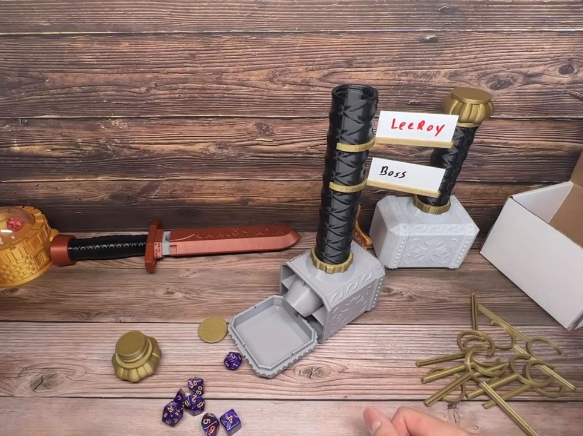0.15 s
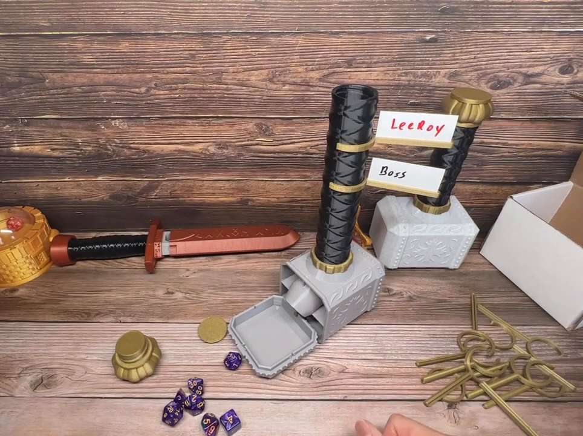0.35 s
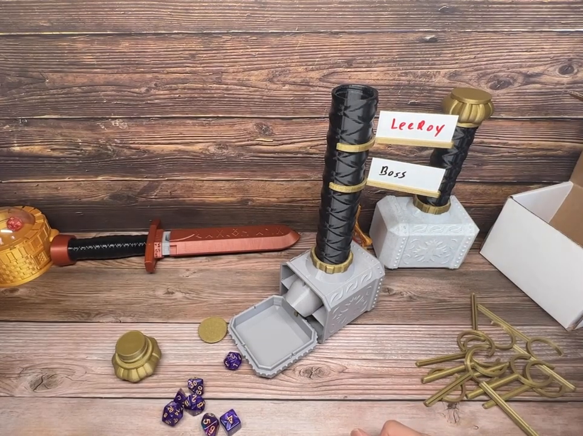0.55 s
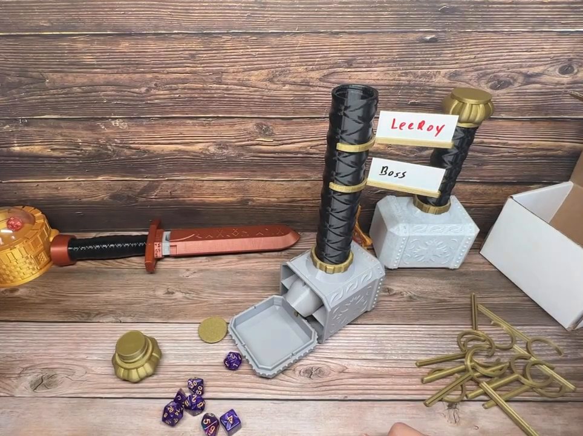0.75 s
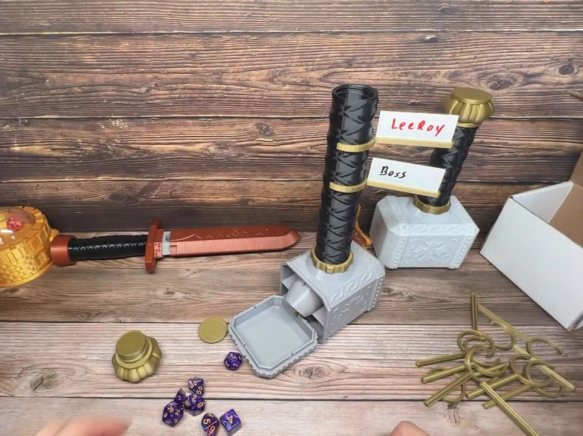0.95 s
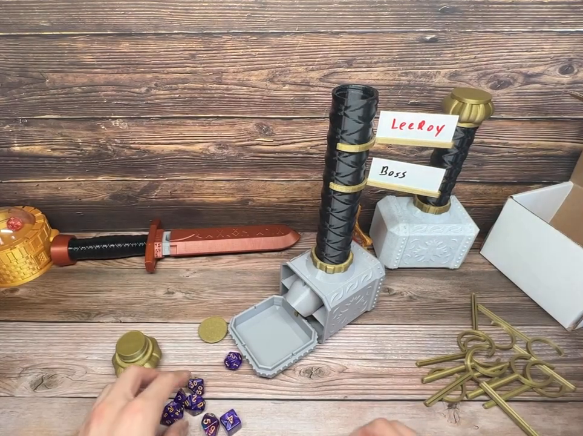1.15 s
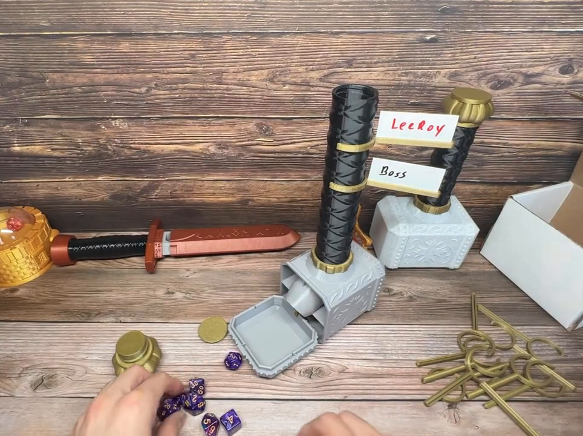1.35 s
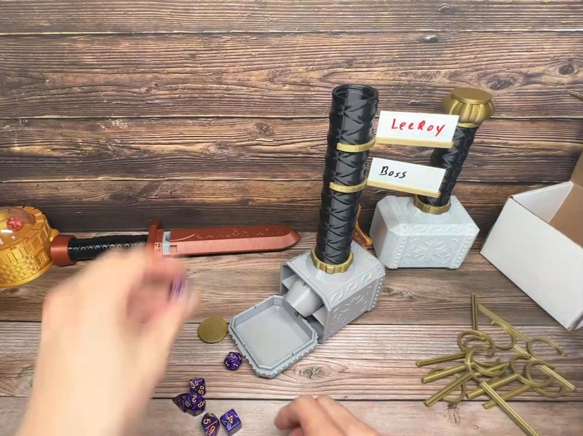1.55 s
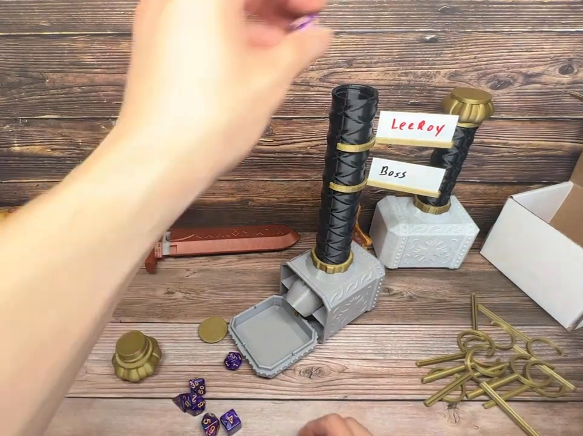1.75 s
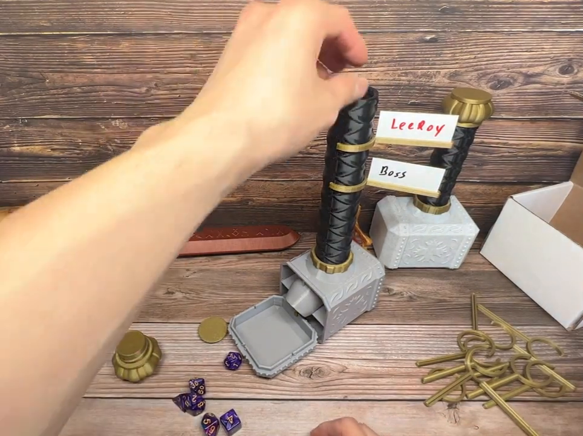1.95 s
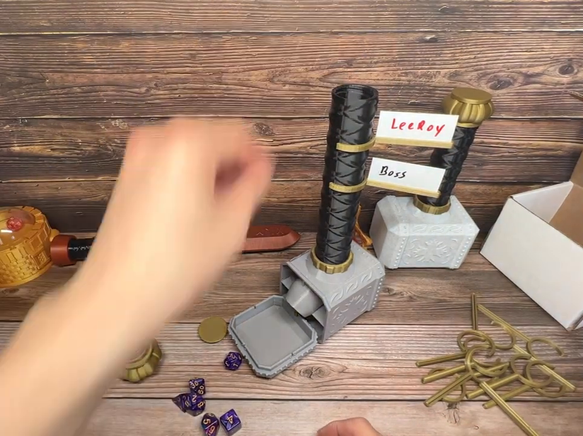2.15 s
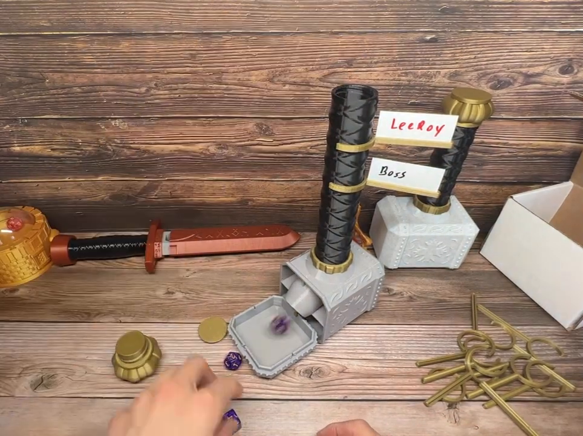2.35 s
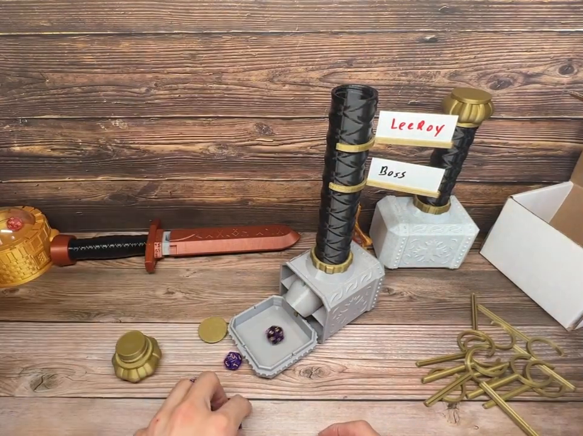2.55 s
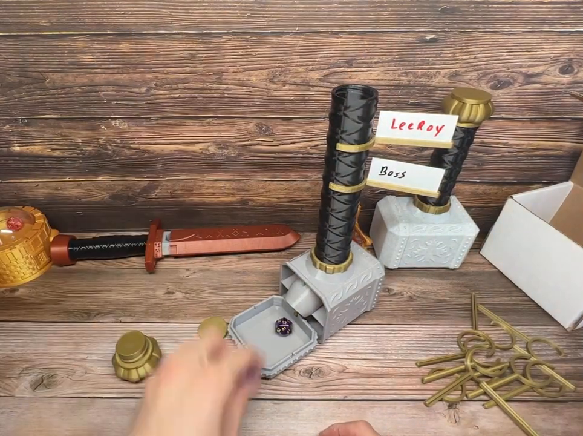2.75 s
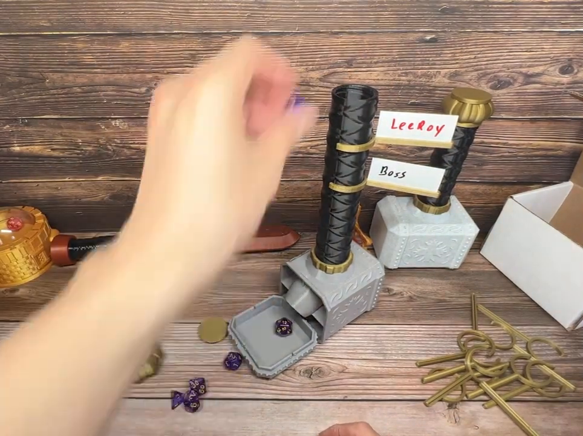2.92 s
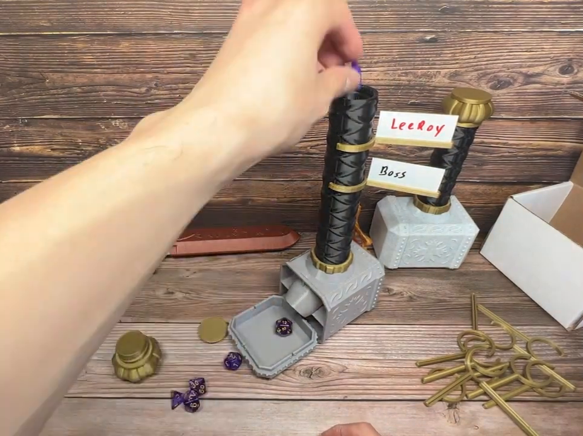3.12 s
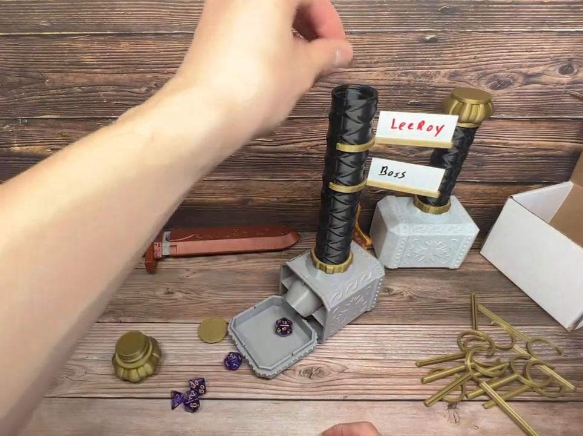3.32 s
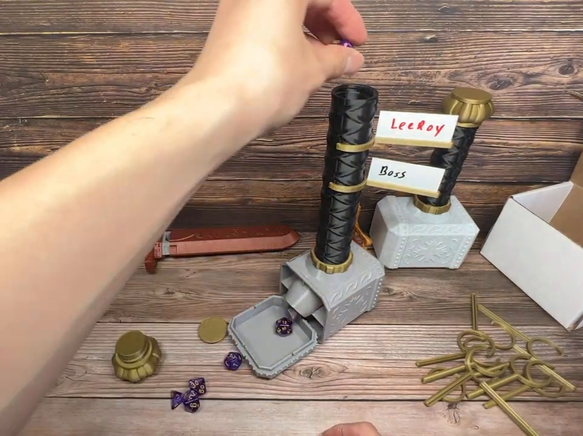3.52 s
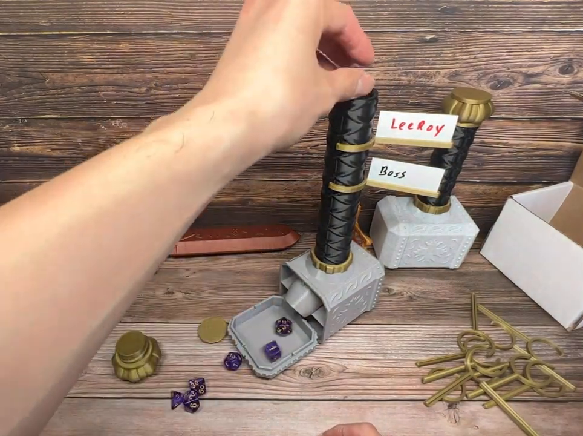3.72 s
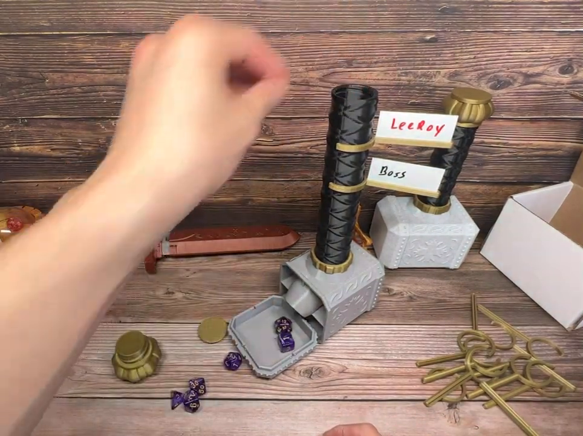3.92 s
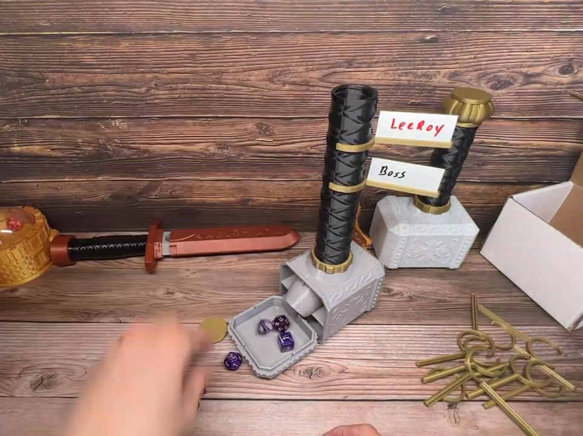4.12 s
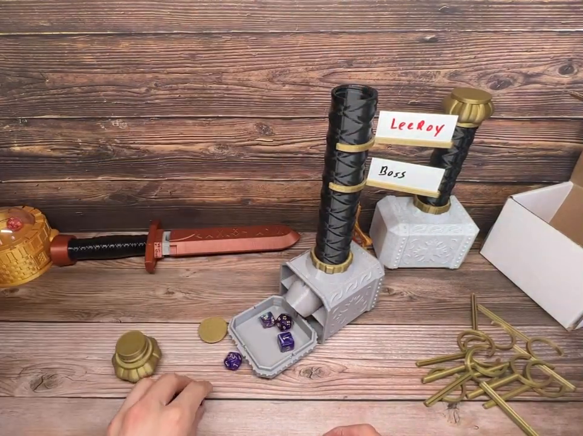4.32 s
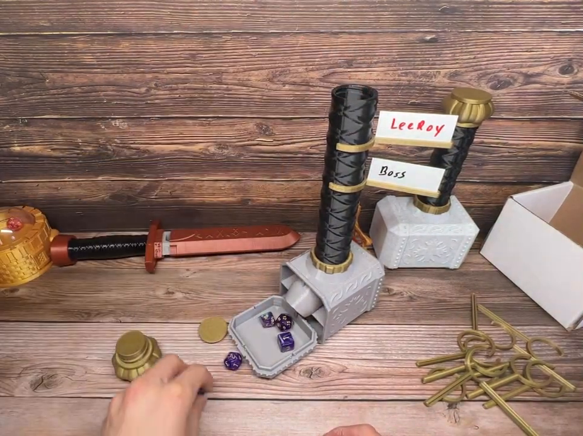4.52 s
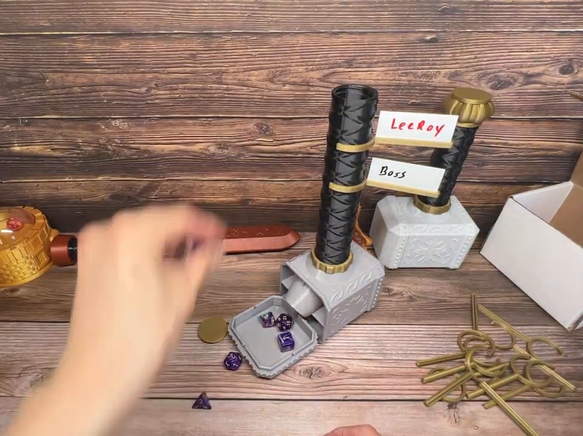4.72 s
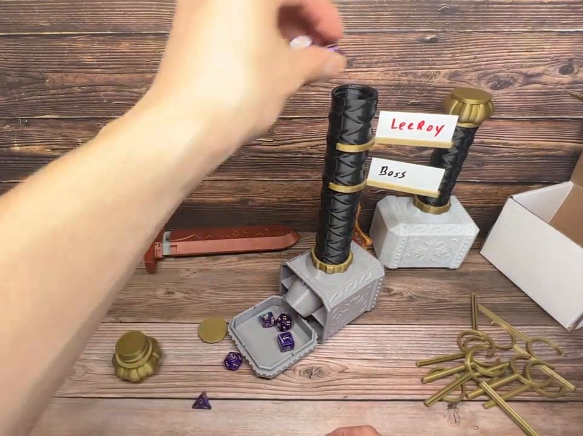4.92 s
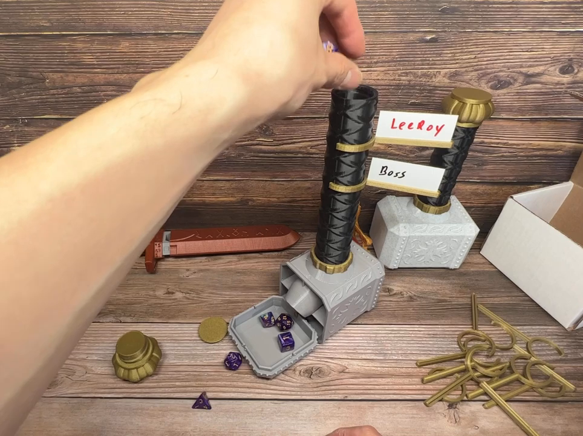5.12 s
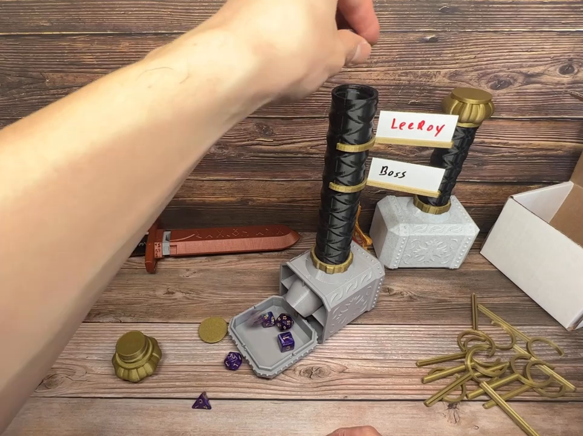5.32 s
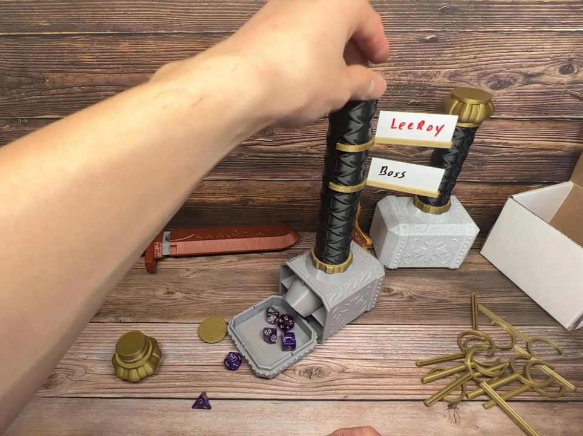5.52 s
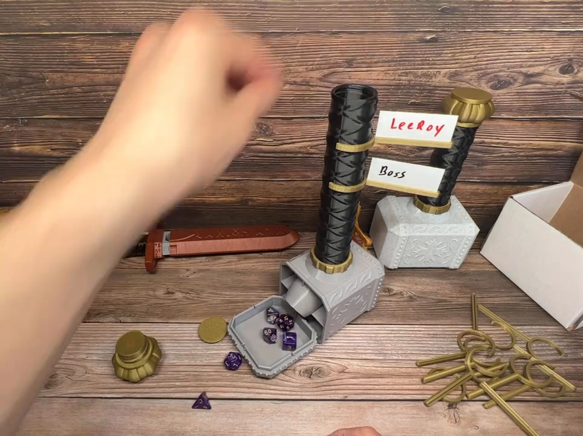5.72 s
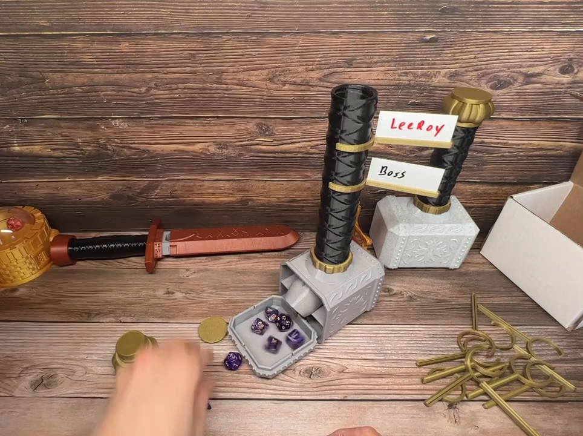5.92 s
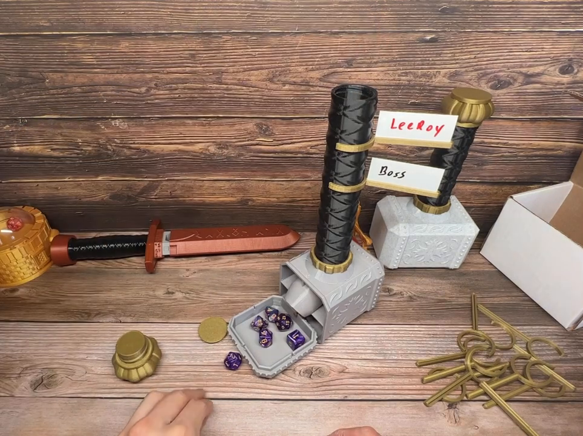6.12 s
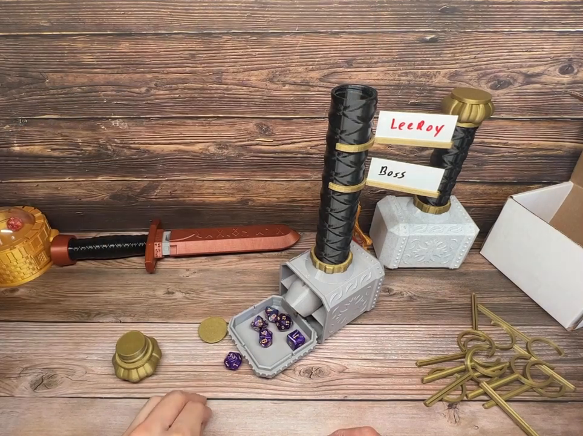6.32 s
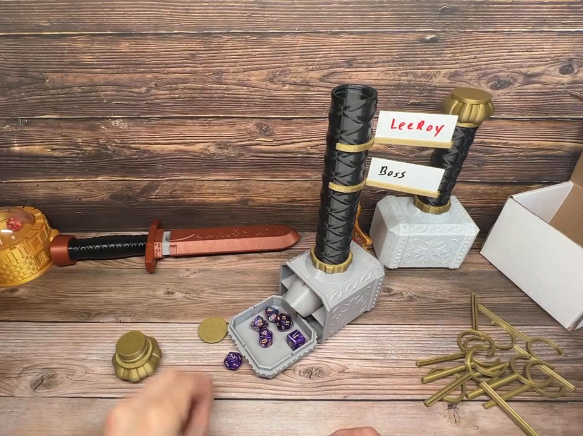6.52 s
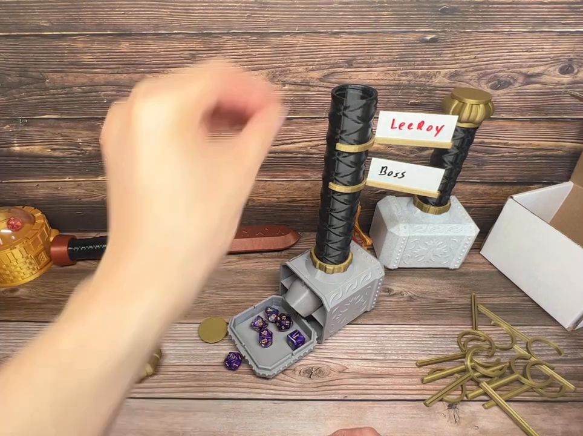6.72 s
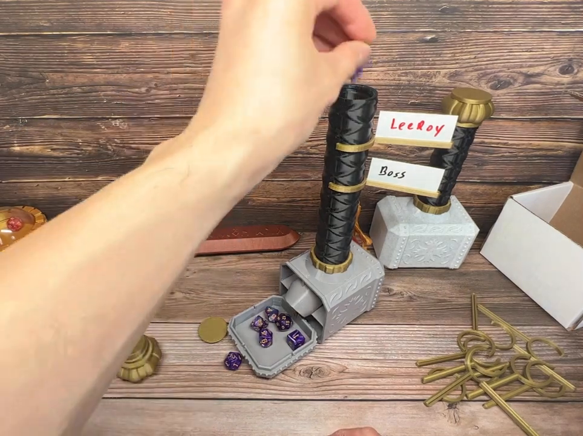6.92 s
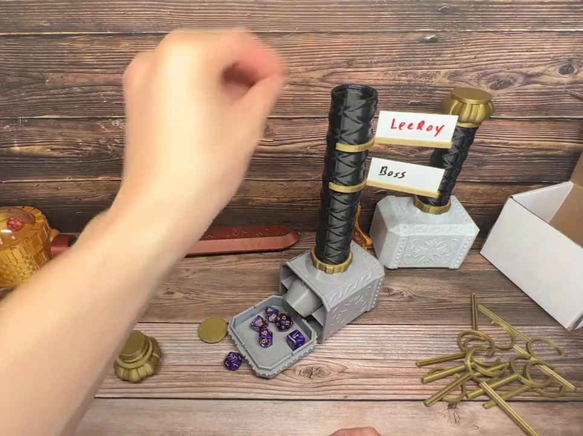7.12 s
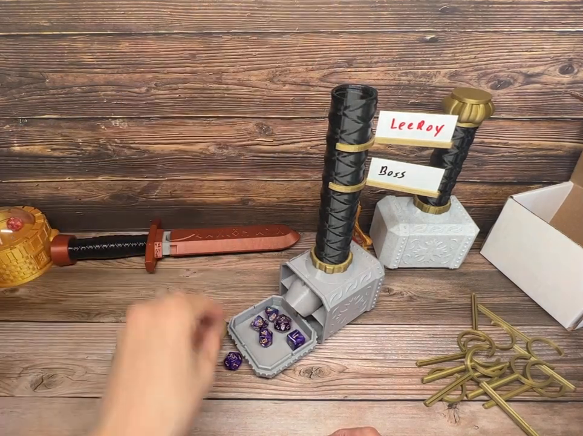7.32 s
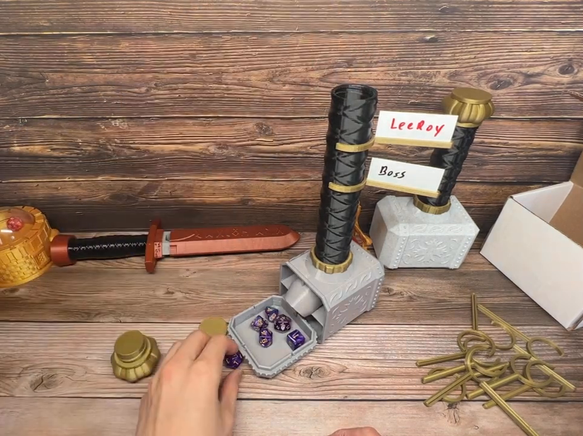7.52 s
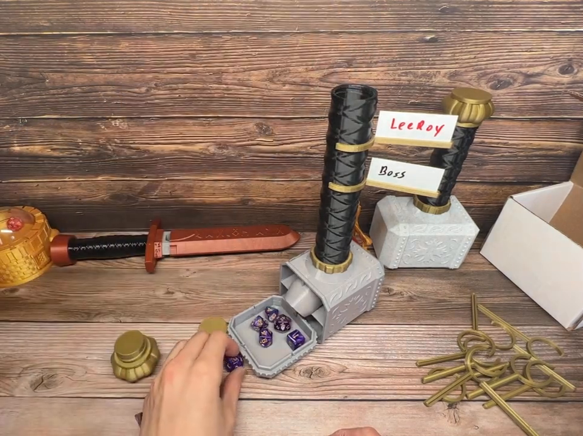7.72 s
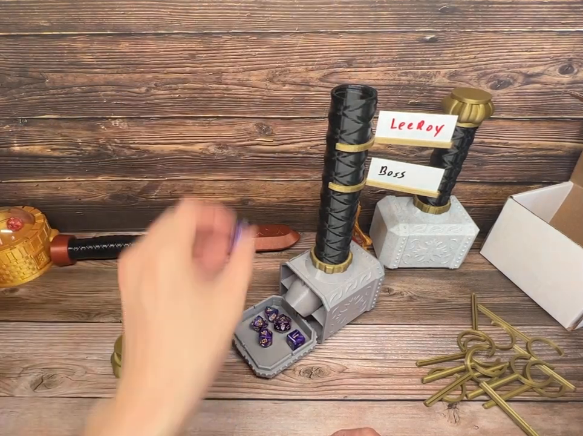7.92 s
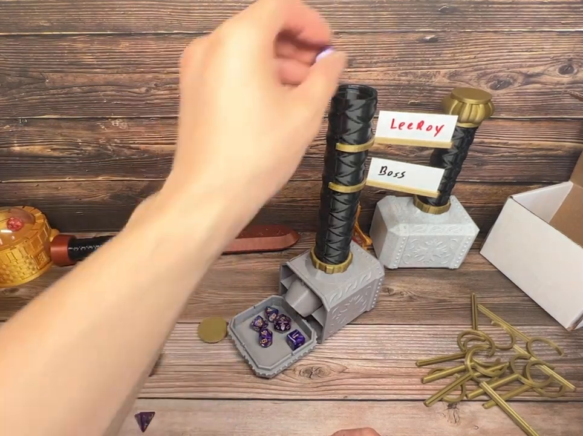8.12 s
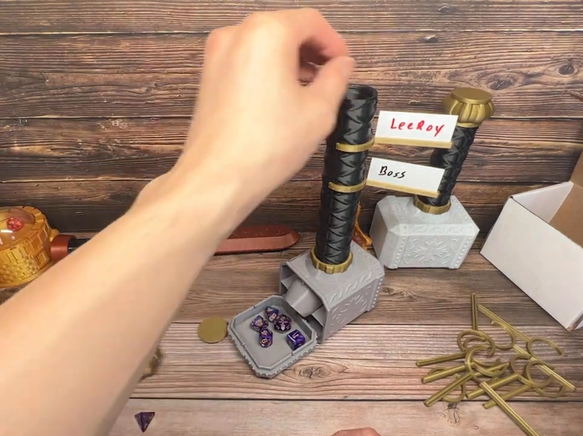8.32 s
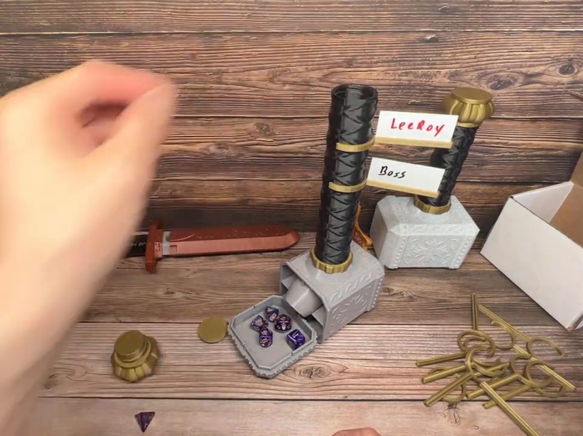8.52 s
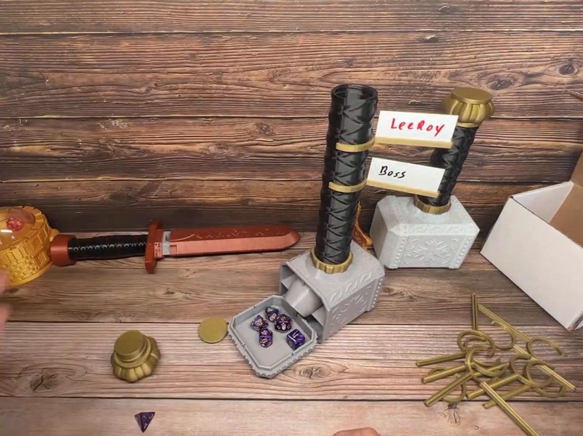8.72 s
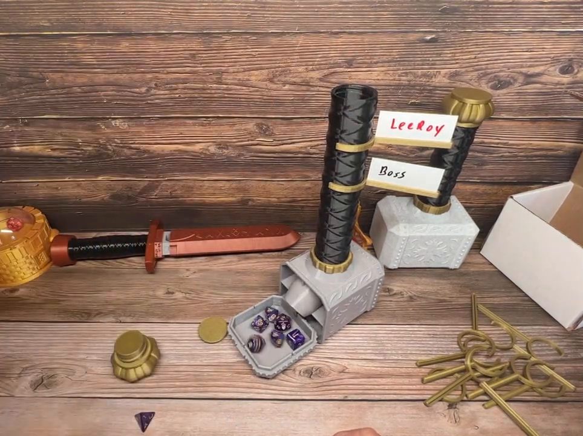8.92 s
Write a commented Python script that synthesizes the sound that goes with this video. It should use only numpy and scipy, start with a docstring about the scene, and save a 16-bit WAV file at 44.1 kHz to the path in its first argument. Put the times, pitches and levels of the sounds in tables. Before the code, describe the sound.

A quiet small room with a faint wavering low hum, heard closely in stereo. A soft sleeve swish opens, with little cloth movements around 1 s and tiny dice clicks at 1.35-1.45. At 2.0 a die ticks down a plastic tube, bangs on the hollow ramp at 2.2, then bounces and rolls in the tray until 2.7. More ticks start at 3.2, with a loud bang at 3.45 and tray bounces; another bang at 3.97 brings a rattling roll and small clicks to 4.65. Sleeve rustle near 5, ticks at 5.13, bang at 5.32, short clatter; another bang at 5.78 and bounces to 6.1. Faint ticks at 7.05 lead to a bang at 7.2 and bright dice-on-dice clacks until 7.7. Light ticks from 8.3, bangs at 8.46 and 8.75, and a final crisp tray rattle at 8.9.

```python
"""Dice in a plastic tower

Plastic dice drop one by one through a tower on a wooden table: ticks in the tube, bangs on the hollow
ramp, bounces and rolls in the tray, clicks of die on die. A contact is an impulse plus a noise burst,
coloured by the struck part and its ringing modes. Falls thump the table top as decaying sines, and a
small room answers with decaying noise. Filtered noise makes the sleeve swishes and the low hum.
"""
import sys
import numpy as np
from scipy import signal
from scipy.fft import rfft, irfft, next_fast_len
from scipy.io import wavfile

SR = 44100
rng = np.random.default_rng(int(sys.argv[2]) if len(sys.argv) > 2 else 0)


def unload_audio(sound):
    """Save the sound as a 16-bit wav file, at the path given as the first command line argument."""
    columns = np.transpose(np.atleast_2d(sound))
    # keep every value between -1 and 1, then stretch to whole-number steps
    steps = np.round(np.clip(columns, -1, 1) * 32767)
    wavfile.write(sys.argv[1], SR, steps.astype(np.int16))


N = 395123

# Room at rest: (frequency [Hz], relative level per Hz [dB])
AIR_SPECTRUM = [(15, -42), (25, -17.5), (53, -7), (111, -16), (130, -13.5), (195, -7), (223, -15),
                (270, -9), (394, -12.5), (463, -11), (560, -19), (714, -15), (962, -24.5), (1440, -24),
                (16000, -52.5)]
# Hum bands: (centre [Hz], width [Hz], level [dB])
HUM_BANDS = [(48.15, 4.8, -60.5), (144.6, 26, -57.5), (185.4, 42, -55.5), (464.4, 8.8, -67.5)]
# Arm moves in the sleeve: (time of full speed [s], half-width [s], level before the common offset [dB])
SLEEVE_MOVES = [(0.11, 0.15, -51), (0.41, 0.11, -63.5), (1.04, 0.23, -57.5), (1.42, 0.13, -60),
                (1.83, 0.17, -56), (3.1, 0.23, -60), (5.0, 0.27, -63), (6.85, 0.15, -62),
                (8.16, 0.15, -61.5)]
# Cloth noise: (frequency [Hz], relative level per Hz [dB])
CLOTH_SPECTRUM = [(590, -31.5), (1000, 2.5), (1340, -7), (1470, -6), (8360, -5), (11400, -22), (13600, -38),
                  (15100, -33), (16000, -35)]

# Contacts of a die: on another die or the table, on the tube wall, on the ramp in the hollow base, in the tray:
# (time [s], level [dB], extra knock [dB], extra click [dB], pitch of the struck spot [Hz])
DICE_HITS = [(1.3469, -45.5, 11, 17, 7160), (1.3807, -43, 7, 4, 7300), (1.4338, -39.5, 2, 5, 6800),
             (1.7719, -47, 10, -8, 815), (2.6586, -32, 6, 6, 7000), (2.6839, -42, 3, -13, 1510),
             (4.3621, -38, -5, 5, 8020), (4.3871, -39, -5, 0, 6060), (4.4616, -52, 8, 11, 5870),
             (4.5282, -34.5, -8, -4.5, 6140), (4.6266, -49.5, -8, -14, 4270),
             (4.6521, -46.5, -2.5, -10, 2510), (7.2736, -24.5, 9, -3.5, 7500),
             (7.381, -26.5, -4, -17, 3280), (7.3969, -20.5, -12.5, -5, 3150), (7.4461, -31, 0, 0, 4500),
             (7.451, -24, -3, -3.5, 5350), (7.4566, -32, -5, -4, 5430), (7.4865, -35, -14, -5.5, 4950),
             (7.4959, -28, -8, -1, 4920), (7.5259, -24.5, -6.5, -4.5, 4560),
             (7.5841, -20.5, -22, -6.5, 7050), (7.6887, -33.5, -3, -4, 6450)]
TUBE_HITS = [(2.0351, -24.5, 2, 0, 1750), (2.065, -22, 0.5, -9.5, 2550), (2.1143, -25.5, -1, -2, 1850),
             (2.1683, -35, 8.5, 6, 1815), (3.2339, -33.5, 11, -7, 1800), (3.2987, -31.5, 5.5, -4, 1780),
             (3.3527, -30.5, -5, -3, 1920), (3.405, -31.5, 1, 8, 8210), (3.4241, -27, -9, 7, 1800),
             (5.1271, -29, 7.5, -4.5, 2820), (5.1485, -24.5, -1, -6.5, 2176), (5.1759, -32.5, 5, 0, 1810),
             (5.2257, -33, -6, 4, 1910), (7.0577, -36.5, 2, -11, 2612), (7.117, -34, -12, 4, 2630),
             (7.1403, -38.5, 0, 5, 2203), (8.3315, -33.5, 10.5, -2.5, 1855), (8.4161, -36, 5, 0.5, 2170),
             (8.6652, -32, 3.5, -2.5, 2450)]
RAMP_HITS = [(2.2167, -11.5, -10, -8, 1790), (2.2378, -20.5, 6, -7, 1560), (2.2638, -18, -5.5, -6.5, 1480),
             (2.301, -33, 2, -3, 1810), (3.4374, -9.5, -10, -10.5, 1506), (3.4554, -13, -13.5, -15, 2720),
             (3.4779, -16.5, -32.5, -7, 2520), (3.488, -30, 6.5, -1.5, 1460), (3.5523, -19, -2, -9, 1760),
             (3.971, -9.5, -16, -6, 2490), (3.998, -26, 12.5, 4.5, 2530), (4.013, -18.5, 3, -6, 2390),
             (5.3171, -12, -14.5, -1.5, 1787), (5.336, -12.5, -3, -13.5, 2700),
             (5.7783, -10, -6.5, -16, 1790), (5.7978, -22.5, 0, 4, 1540), (5.8099, -18, 2, -6.5, 1780),
             (5.8304, -17, 1.5, 1.5, 1480), (7.1931, -12, -3, 5, 3570), (7.2053, -13.5, -13.5, -2, 2660),
             (7.2451, -19.5, -10.5, -18, 2500), (8.4649, -10, -9.5, -11.5, 2350),
             (8.7469, -11.5, -8, -12, 1510), (8.7872, -22.5, 9, -9, 1180), (8.8112, -21.5, 6, -1.5, 2270)]
TRAY_HITS = [(2.3446, -27.5, -9, -17, 1750), (2.3519, -29, -1.5, -9, 2410), (2.3911, -26, 2.5, -7.5, 2630),
             (2.4064, -24.5, -0.5, -3.5, 2160), (2.4787, -19.5, 2.5, 2.5, 4400),
             (2.5091, -23.5, 9, -12, 870), (2.5203, -30, 14, 3, 885), (2.5686, -31.5, 1, -4, 5540),
             (2.6054, -37, 3, -0.5, 2240), (3.6071, -27, 1, -5, 720), (3.6946, -15, -8, -1.5, 4580),
             (3.7432, -22.5, -0.5, -10, 3160), (3.7843, -29, 0.5, 5, 3310), (3.8135, -26.5, 1.5, 5, 4150),
             (3.8262, -32, -10.5, -5, 5370), (3.8582, -31, -7, -3.5, 3240), (4.033, -24.5, -3.5, -9, 2080),
             (4.0511, -32, 0.5, 8.5, 7340), (4.1044, -19.5, 1.5, -3, 3190), (4.1346, -24.5, -2, 5.5, 4700),
             (4.1987, -28.5, -8, 0.5, 3240), (4.2416, -30, -8, 2, 5140), (4.2511, -30, -1.5, -5, 2390),
             (4.283, -34, 6, -1, 1430), (5.4223, -20, -2, -5.5, 2180), (5.4361, -15.5, -18, -3.5, 3300),
             (5.4976, -33, -12.5, 6, 4890), (5.5289, -29.5, -2.5, 7, 4750), (5.5469, -33, -0.5, -1.5, 3530),
             (5.5754, -35, -15.5, -3.5, 5120), (5.8668, -23, -2.5, 4.5, 1790), (5.9142, -20, -9, -7, 3100),
             (5.9254, -18, -3, 0, 3230), (5.9454, -24, -10.5, -0.5, 2440), (6.0277, -27.5, 0, 3, 3230),
             (6.0955, -33.5, -0.5, -6, 2450), (8.885, -19, 1, -4, 3177), (8.89, -15.5, -1.5, -3.5, 3250),
             (8.9072, -22.5, -15, 10, 3390)]
# Colour of a contact on each part: (frequency [Hz], gain [dB])
DICE_TONE = [(60, -17), (180, -4.5), (400, -6.5), (700, -4.5), (1300, -10), (2200, -7), (3200, -2),
             (4000, -1.5), (6000, 1.5), (8500, 1), (11000, -10.5), (13500, -19.5), (16000, -32)]
TUBE_TONE = [(60, -17), (180, -8), (420, -14.5), (720, -7), (1100, -11.5), (1400, -10), (1800, -3),
             (2700, -4), (4000, -14.5), (7000, -16), (9000, -16.5), (11000, -25), (16000, -38.5)]
RAMP_TONE = [(60, -14.5), (200, -1.5), (420, -31), (700, -4), (1250, -23.5), (1450, -3), (2000, -2.5),
             (2800, -2.5), (4000, -10.5), (6000, -6.5), (9000, -11.5), (12000, -22), (16000, -47.5)]
TRAY_TONE = [(60, -10), (260, -5.5), (400, -11.5), (700, -5), (950, -1), (1300, -14.5), (1700, -4),
             (3200, -7), (4000, -9), (6000, -6), (9000, -9.5), (13000, -23), (16000, -37.5)]
# Ringing modes of each part: (frequency [Hz], relative level [dB])
DICE_MODES = [(3262, -17.5), (4037, 0), (4850, 6), (5017, 4), (5383, -12), (6739, 9)]
TUBE_MODES = [(689, -2.5), (1458, 0.5), (1803, 1), (2637, -11.5), (4941, -6), (5873, -15.5), (6481, -19),
              (7574, -27.5)]
RAMP_MODES = [(215, -15), (387, -10.5), (635, -9), (963, -12.5), (1157, -6), (1480, -4), (1771, -5),
              (2131, -8), (2562, -13), (3881, -9), (4317, -23.5), (5377, -11.5)]
TRAY_MODES = [(279, 1), (662, 6), (1781, 0), (2223, 2), (3181, -4), (4742, -7), (8037, -16), (10712, -32)]
# Table top under the tower, then under the tray: (frequency [Hz], relative level [dB])
TOWER_TABLE_MODES = [(145, -5.5), (208, -2), (278, -2.5)]
TRAY_TABLE_MODES = [(235, -1.5), (280, -1), (470, -10)]
# A die rolls over its edges: (start [s], length [s], starting level [dB])
ROLLS = [(2.344, 0.33, -44.5), (3.745, 0.2, -49), (4.056, 0.42, -49.5), (5.476, 0.15, -45),
         (5.969, 0.19, -44), (7.46, 0.18, -50.5), (8.567, 0.19, -52.5)]
# Plastic under a rolling die: (resonance [Hz], width [Hz], relative level [dB])
ROLL_RESONANCES = [(277.7, 60, -6.5), (665, 130, -8.5), (1087, 29, 7.5), (1532, 98, 2.5), (2426, 170, -1.5),
                   (5200, 1500, -11.5)]

# Decay of the room: (frequency [Hz], time to fall 60 dB [s])
ROOM_T60 = [(200, 0.056), (600, 0.29), (1500, 0.3), (4000, 0.27), (9000, 0.33), (15000, 0.21)]
# Colour of the room: (frequency [Hz], relative level [dB])
ROOM_TONE = [(80, 1.5), (220, 4.5), (450, 10), (1500, 2), (5000, 3), (10000, -7), (15000, 1)]
# Diffuse sound: (frequency [Hz], left-right correlation [-1 to 1])
LIKENESS = [(100, 0.77), (300, 0.56), (700, 0), (1400, 0.0078)]
# Direct sound: (frequency [Hz], left-right difference [dB])
BEAM = [(500, 0), (1200, -0.5), (2200, 1), (3300, 2), (5500, 7), (9000, 2), (14000, -3)]

TOP_HZ = 16100
ROLL_LOSS_DB = 9  # start to stop of a roll
TOPPLE_DB = 7.5  # drop onto the next face, over the roll level
PAN_SCATTER_DB = 2.5  # left-right spread among contacts


def amp(db):
    """dB to amplitude."""
    return 10 ** (np.asarray(db) / 20)


def unit(x):
    """Scaled to rms 1."""
    return x / np.sqrt(np.mean(x ** 2) + 1e-20)


def norm(x):
    """Scaled to a mean energy of 1 per channel."""
    return unit(x) / np.sqrt(x.shape[-1])


def along(points, hz):
    """(Hz, value) points interpolated on a log frequency axis."""
    f, v = np.transpose(points)
    return np.interp(np.log(hz + 1), np.log(f), v)


def filtered(x, response):
    """x times a response of frequency."""
    n = x.shape[-1]
    m = next_fast_len(n + 1024, True)
    return irfft(rfft(x, m) * response(np.fft.rfftfreq(m, 1 / SR)), m)[..., :n]


def causal(gain, size=2048):
    """Minimum-phase impulse response with a given gain of frequency."""
    cepstrum = irfft(np.log(gain(np.fft.rfftfreq(size, 1 / SR)) + 1e-6))
    cepstrum[1:size // 2] *= 2
    cepstrum[size // 2 + 1:] = 0
    return irfft(np.exp(rfft(cepstrum)))[:size // 2]


def diffuse(size):
    """Stereo noise from all sides: alike in the bass, unrelated in the treble."""
    def mid_side_gain(hz):
        angle = np.arccos(np.clip(along(LIKENESS, hz), -1, 1)) / 2
        return np.array([np.cos(angle), np.sin(angle)])

    mid, side = filtered(rng.standard_normal((2, size)), mid_side_gain)
    return np.array([mid + side, mid - side])


def add(track, s, sound):
    """Mixes a sound into the track at time s."""
    i = max(round(s * SR), 0)
    track[:, i:i + sound.shape[1]] += sound[:, :max(N - i, 0)]


def background(air_db=-55):
    """Low room noise plus narrow noise bands, heard as a wavering hum."""
    air = amp(air_db) * unit(filtered(diffuse(size=N), lambda hz: amp(along(AIR_SPECTRUM, hz))))
    hum = np.zeros(N)
    for centre_hz, width_hz, db in HUM_BANDS:
        noise = rng.standard_normal(N)
        band = filtered(noise, lambda hz: 1 / (1 + (2 * (hz - centre_hz) / width_hz) ** 2))
        hum += amp(db) * unit(band)
    return air + hum


def sleeve(offset_db=-1):
    """Cloth swishes as the arm moves: noise follows the arm's speed, a bell per move."""
    t = np.arange(N) / SR
    speed = sum(amp(db) * np.exp(-((t - s) / half_width_s) ** 2) for s, half_width_s, db in SLEEVE_MOVES)
    cloth = unit(filtered(diffuse(size=N), lambda hz: amp(along(CLOTH_SPECTRUM, hz))))
    return amp(offset_db) * speed * cloth


def room_tail(build_s=.009):
    """One random answer of the room: it builds up, then each frequency dies at its own speed."""
    hz, t, z = signal.stft(diffuse(size=SR * 2 // 5), SR, nperseg=256)
    decay_db = along(ROOM_TONE, hz)[:, None] - 60 * t / along(ROOM_T60, hz)[:, None]
    tail = signal.istft(z * amp(decay_db), SR, nperseg=256)[1]
    t = np.arange(tail.shape[1]) / SR
    return norm(tail * (1 - np.exp(-(t / build_s) ** 2)))


def spot_colour(hz, knock_db, click_db, spot_hz, spot_db, width=.065):
    """A flat face knocks, a corner clicks, and the struck spot favours one pitch."""
    tilt_db = along([(900, knock_db), (1400, 0.0), (3200, 0.0025), (4800, click_db)], hz)
    return amp(tilt_db + spot_db / (1 + (np.log((hz + 1) / spot_hz) / width) ** 2))


def path(hz, wall_s, wall=0.28, table_s=.005, table_hz=420):
    """The wall behind the tower returns each hit; the bass comes late, by way of the table top."""
    bass = 1 / (1 + (hz / table_hz) ** 8)
    lag_cycles = np.cumsum(table_s * bass) * hz[1]
    return np.exp(-2j * np.pi * lag_cycles) * (1 + wall * np.exp(-2j * np.pi * hz * wall_s))


def direct(hz, aim_db, lead_s=.00006):
    """Direct sound reaches the left channel slightly first; short waves are beamed to one side."""
    lead = np.exp(-2j * np.pi * hz * np.array([[0], [lead_s]]))
    difference_db = along(BEAM, hz) + aim_db * hz / (hz + 700)
    return lead * amp(np.array([[1], [-1]]) / 2 * difference_db)


def contacts(hits, tone, modes, tails, snap, rise_s, chatter_t60_s, ring_db, ring_t60_s, spot_db,
             room_db, pan_db, apart=0.71, wall_s=.0038):
    """Every contact is a snap with a short chatter of edges, coloured by the part that is struck."""
    track, t = np.zeros((2, N)), np.arange(SR // 15) / SR
    mode_hz, mode_db = np.transpose(modes)
    body = causal(lambda hz: amp(along(tone, hz)))
    swell = 1 - np.exp(-t / rise_s)
    first = SR // 125  # 8 ms, sets the level
    for s, db, knock_db, click_db, spot_hz in hits:
        # the shell radiates a little differently to each side
        grit = rng.standard_normal(len(t)) + apart * diffuse(size=len(t))
        force = norm(grit * swell * amp(-60 * t / chatter_t60_s))
        force[:, 0] += snap

        # each blow weights the modes anew
        strength = amp(mode_db + rng.normal(0, 2.7, len(modes)))
        ring = strength @ np.sin(2 * np.pi * (mode_hz[:, None] * t + rng.random((len(modes), 1))))
        ring = ring * swell * amp(-60 * t / ring_t60_s)

        hit = norm(signal.fftconvolve(force, body[None])[:, :len(t)]) + amp(ring_db) * norm(ring)
        spot = causal(lambda hz: spot_colour(hz, knock_db, click_db, spot_hz, spot_db))
        hit = signal.fftconvolve(hit, spot[None])[:, :len(t)]
        echo_s = wall_s * rng.normal(1, .05, (2, 1))
        hit = filtered(hit, lambda hz: path(hz, echo_s))
        hit = hit * amp(db) / np.sqrt(np.mean(hit[:, :first] ** 2))

        tail = tails[rng.integers(len(tails))]
        add(track, s, amp(room_db) * signal.fftconvolve(hit, tail, axes=1))
        aim_db = pan_db + rng.normal(0, PAN_SCATTER_DB)
        add(track, s, filtered(hit, lambda hz: direct(hz, aim_db)))
    return track


def die_clicks(tails):
    """Hard clicks of a die on another die or on the table."""
    return contacts(DICE_HITS, DICE_TONE, DICE_MODES, tails, snap=0.13, rise_s=0.00071,
                    chatter_t60_s=0.018, ring_db=-10.5, ring_t60_s=0.0492, spot_db=7,
                    room_db=-7.5, pan_db=5.0)


def tube_ticks(tails):
    """Light ticks of a die grazing the tube wall."""
    return contacts(TUBE_HITS, TUBE_TONE, TUBE_MODES, tails, snap=0.29, rise_s=0.0055,
                    chatter_t60_s=0.014, ring_db=-8, ring_t60_s=0.072, spot_db=8.0,
                    room_db=-10, pan_db=0.5)


def ramp_bangs(tails):
    """Heavy bangs of a die on the ramp, ringing the hollow base."""
    return contacts(RAMP_HITS, RAMP_TONE, RAMP_MODES, tails, snap=0.23, rise_s=0.00058,
                    chatter_t60_s=0.014, ring_db=-10, ring_t60_s=0.068, spot_db=7.0,
                    room_db=-9, pan_db=-1.5)


def table_thumps(hits, modes, thump_db, knock_share, click_share, t60_s=.12, rise_s=0.0043):
    """Every fall thumps the table top into decaying modes; a flat landing does so most."""
    track, t = np.zeros((2, N)), np.arange(SR // 5) / SR
    swell = (1 - np.exp(-(t / rise_s) ** 2)) * amp(-60 * t / t60_s)
    for s, db, knock_db, click_db, _ in hits:
        ring = sum(amp(level_db + rng.normal(0, 1.5)) * np.sin(2 * np.pi * hz * t) for hz, level_db in modes)
        hit_db = db + thump_db + knock_share * knock_db - click_share * click_db
        add(track, s, amp(hit_db) * swell * ring[None])
    return track


def roll_db(level_db, progress):
    """A roll fades evenly in dB from its start (progress 0) to its stop (1)."""
    return level_db - ROLL_LOSS_DB * progress


def roll_gain(fade_s):
    """Gain per sample of all rolls, each with soft ends."""
    t, gain = np.arange(N) / SR, np.zeros(N)
    for s, length_s, db in ROLLS:
        inside = np.clip(t, s, s + length_s)
        gain += amp(roll_db(db, (inside - s) / length_s)) * np.exp(-((t - inside) / fade_s) ** 2)
    return gain


def roll_shell(hz):
    """Resonances of the plastic, summed with alternating sign."""
    response = 0
    for k, (centre_hz, width_hz, db) in enumerate(ROLL_RESONANCES):
        damping = 1j * hz * width_hz
        response = response + (-1) ** k * amp(db) * damping / (centre_hz ** 2 - hz ** 2 + damping)
    return response


def rolling(tail, taps_per_s=280, scatter_db=4, room_db=-3):
    """The edges of a tumbling die patter on the plastic: random taps through its resonances."""
    taps = (rng.random(N) < taps_per_s / SR) * amp(rng.normal(0, scatter_db, N))
    patter = unit(filtered(taps, roll_shell)) * roll_gain(fade_s=0.0066)
    return patter + amp(room_db) * signal.fftconvolve(patter[None], tail, axes=1)[:, :N]


def topples(count=3, knock_db=-2, click_db=-2, scatter_db=2):
    """A rolling die drops onto new faces, on average ever more softly, at random tray-mode pitches."""
    hits = []
    for s, length_s, db in ROLLS:
        for k in range(count):
            progress = (k + rng.random()) / count
            level_db = roll_db(db, progress) + TOPPLE_DB + rng.normal(0, scatter_db)
            spot_hz = TRAY_MODES[rng.integers(len(TRAY_MODES))][0]
            hits.append((s + progress * length_s, level_db, knock_db, click_db, spot_hz))
    return hits


def tray_bounces(tails):
    """Bounces and topples of a die in the tray, ringing its modes."""
    return contacts(TRAY_HITS + topples(), TRAY_TONE, TRAY_MODES, tails, snap=0.14, rise_s=0.0021,
                    chatter_t60_s=0.015, ring_db=-9, ring_t60_s=0.079, spot_db=7.0,
                    room_db=-10.0, pan_db=0.4)


def dice():
    """All contacts, rolls and table thumps, sharing 16 random room answers."""
    tails = [room_tail() for _ in range(16)]
    hits = die_clicks(tails) + tube_ticks(tails) + ramp_bangs(tails) + tray_bounces(tails)
    tower_thumps = table_thumps(RAMP_HITS, TOWER_TABLE_MODES, thump_db=-22.0, knock_share=.1, click_share=0.18)
    tray_thumps = table_thumps(TRAY_HITS, TRAY_TABLE_MODES, thump_db=-15, knock_share=1.0, click_share=0.089)
    return hits + tower_thumps + rolling(tails[0]) + tray_thumps


def scene():
    """Room noise, sleeve and dice, summed."""
    return background() + sleeve() + dice()


def record(dry, low_cut_hz=40):
    """Peaks are rounded off at full scale; the deepest bass and the top treble are cut."""
    held = dry / (1 + np.abs(dry) ** 6) ** (1 / 6)

    def band(hz):
        low_cut = hz ** 5 / np.sqrt(hz ** 10 + low_cut_hz ** 10)
        return np.exp(-(hz / TOP_HZ) ** 40) * low_cut

    return filtered(held, band)


dry = scene()
out = record(dry)
unload_audio(out)
```